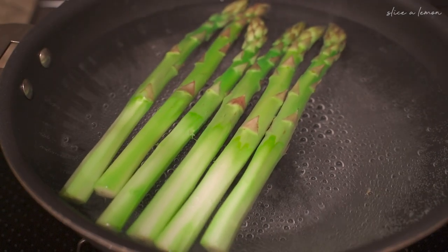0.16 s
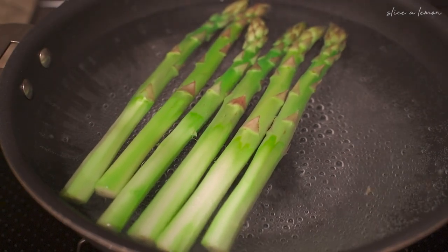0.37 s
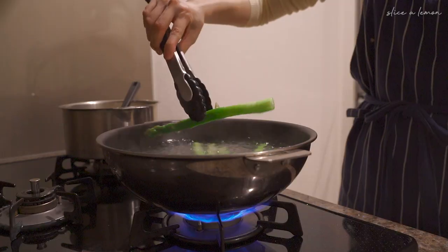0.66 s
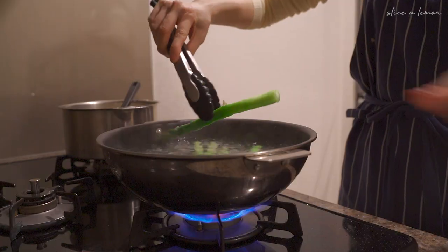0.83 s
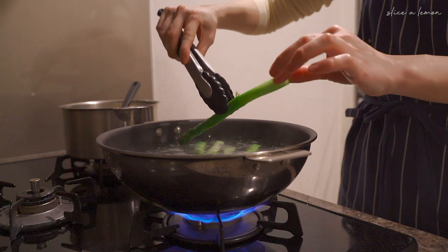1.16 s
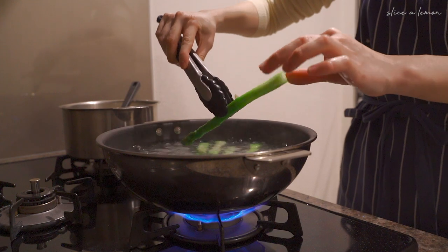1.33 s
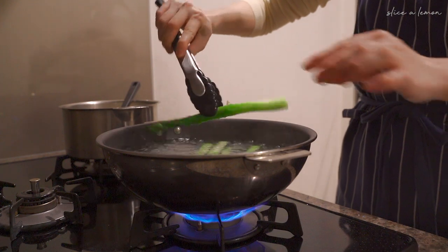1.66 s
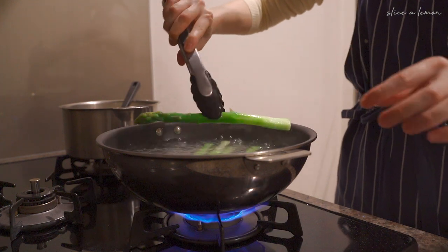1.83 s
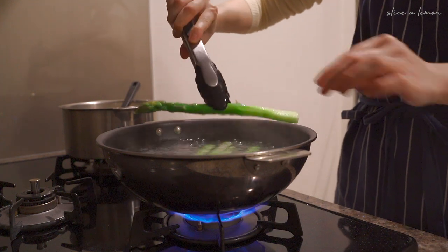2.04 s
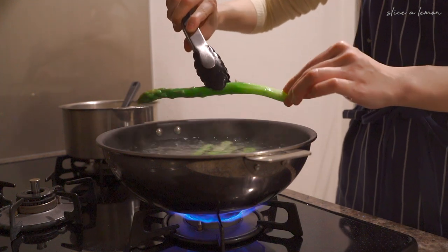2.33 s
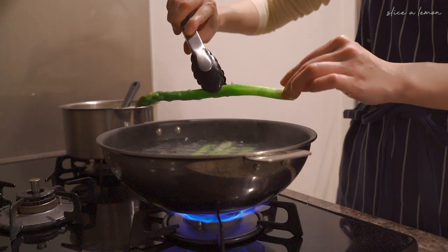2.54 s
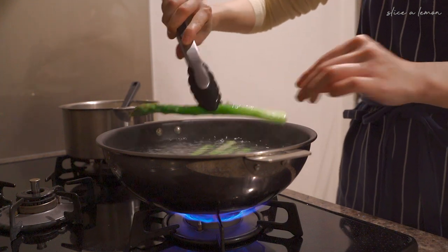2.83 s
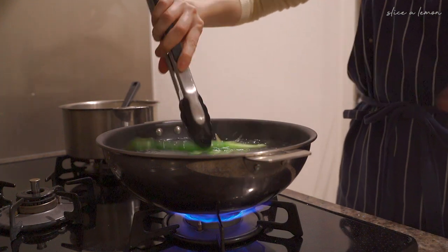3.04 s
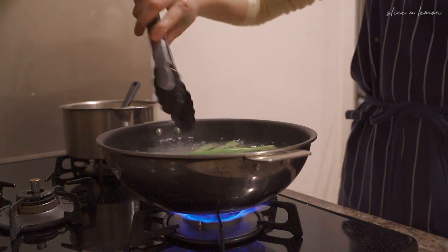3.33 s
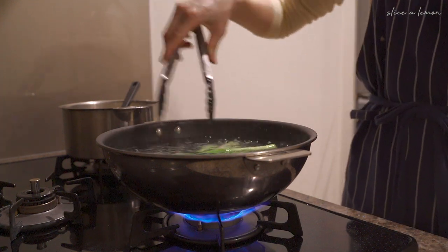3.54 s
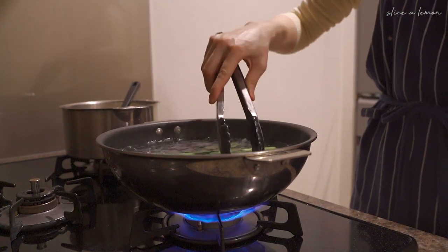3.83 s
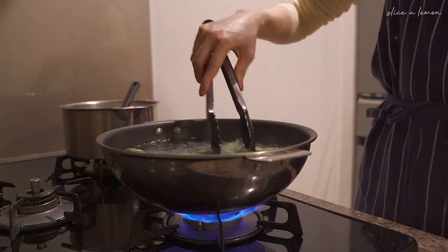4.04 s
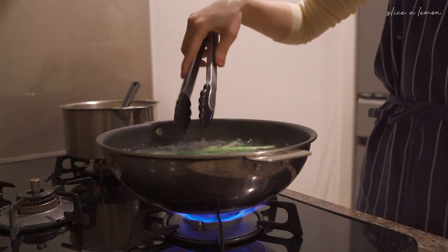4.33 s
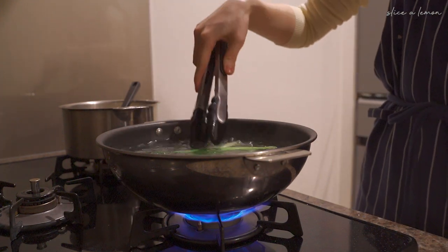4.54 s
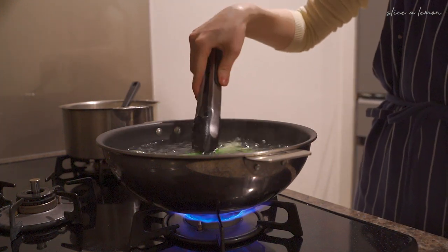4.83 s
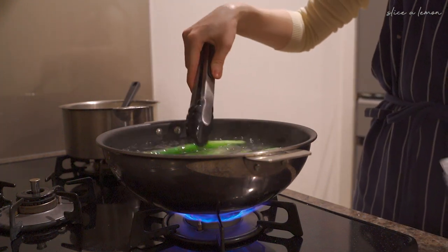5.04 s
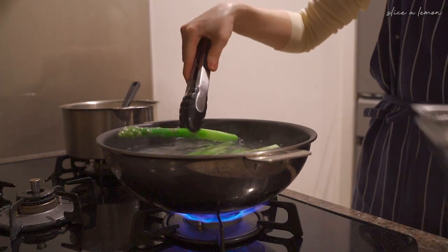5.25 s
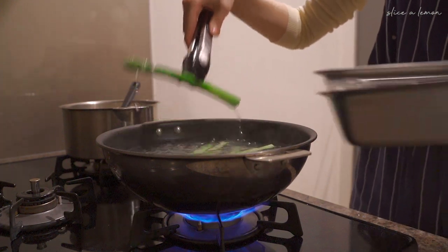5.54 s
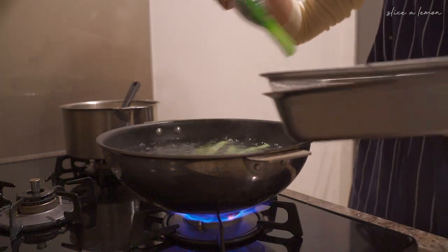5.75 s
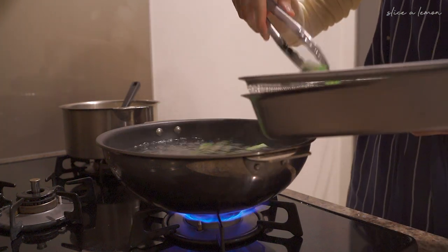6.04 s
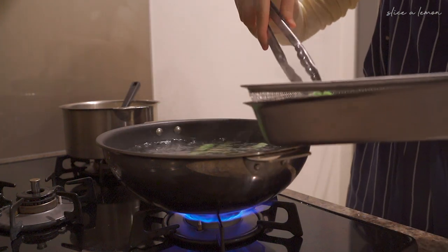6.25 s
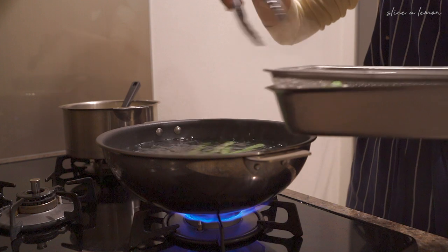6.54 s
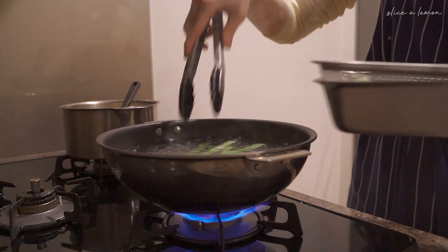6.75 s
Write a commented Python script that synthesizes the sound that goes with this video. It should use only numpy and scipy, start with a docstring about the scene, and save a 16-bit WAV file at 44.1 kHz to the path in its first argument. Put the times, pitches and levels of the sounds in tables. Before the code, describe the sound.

A shallow pan of water with asparagus simmers quietly throughout: dense bubble crackle, a midrange metallic shimmer from the pan, and a faint gas-flame rush. At first it is heard from above; at about 0.5 s the tone switches to a position beside the stove, with a small watery swish and more airy surface fizz. Sparse tiny high pops tick through the simmer. Around 4.0 s tongs stir with a short splashy swish and faint pan tap, and the fizz swells slightly. At 4.5 s a trapped air pocket gives a brief rising bloop, followed by a soft bump at 4.6 s and a firmer, damped clack at 4.8 s. The boil continues alone until 6.2 s, when tongs hit a steel tray with a loud, dull, hollow clank, then at 6.4 s a brighter, sharper rim click. Both ring briefly in a small kitchen, and simmering carries on to the end near 7 s.

```python
"""Asparagus simmers in a shallow pan of water over a gas flame, heard from above the pan.
Half a second in, the listening place changes to beside the stove.
Steam bubbles collapse on the hot base and ring the pan, tiny ones burst at the surface, the flame rushes.
At about four seconds tongs stir the water and knock the pan, and a trapped air pocket rings.
After six seconds they strike a steel tray twice as a spear is laid in it: damped modes, noise and a tick."""
import sys
import numpy as np
from scipy import signal
from scipy.fft import rfft, irfft, next_fast_len
from scipy.io import wavfile
from scipy.ndimage import map_coordinates

SR = 44100
rng = np.random.default_rng(int(sys.argv[2]) if len(sys.argv) > 2 else 0)


def generate_wav(sig):
    """Save sig (samples, or channels by samples) to the path in sys.argv[1] as 16-bit PCM at SR."""
    pcm = np.round(np.clip(np.atleast_2d(sig).T, -1, 1) * 32767).astype(np.int16)
    wavfile.write(sys.argv[1], SR, pcm)


N = 303832
TIME = np.arange(N) / SR
RING_TIME = TIME[:SR // 2]  # the half second given to each knock and to the room tail

# how fast the dense noise of a knock dies on pan or tray: (frequency [Hz], t60 [s])
CLASH_DECAY = [(150, .12), (500, 0.15), (1500, 0.18), (4000, 0.27), (7000, 0.15), (12000, .11)]


def amp(db):
    """Decibels to gain."""
    return 10 ** (np.asarray(db) / 20)


def unit(x):
    """Scale to rms 1."""
    return x / np.sqrt(np.mean(x ** 2) + 1e-20)


def along(points, hz):
    """Read (frequency, value) points on a log frequency axis."""
    f, v = np.transpose(points)
    return np.interp(np.log(hz + 1), np.log(f + 1), v)


def wobble(rate):
    """A smooth random curve with rate knots a second."""
    knots = rng.standard_normal(int(N * rate / SR) + 4)
    return map_coordinates(knots, [TIME * rate])


def filtered(x, response):
    """Multiply the spectrum of x by a response that depends on frequency."""
    m = next_fast_len(len(x) + SR // 2)
    hz = np.fft.rfftfreq(m, 1 / SR)
    return irfft(rfft(x, m) * response(hz), m)[:len(x)]


def resonate(x, modes):
    """Pass x through steep-sided resonances, whose powers add."""
    def response(hz):
        power = 0
        for centre, width, db in modes:
            offset = (hz - centre) / (0.64 * width)
            power = power + amp(db) ** 2 / (1 + offset ** 2) ** 2
        return np.sqrt(power)

    return filtered(x, response)


def coloured(x, spectrum):
    """Give x the colour of a (frequency [Hz], level [dB]) curve."""
    return filtered(x, lambda hz: amp(along(spectrum, hz)))


def roll_off(x, hz, kind, order):
    """A causal low-pass or high-pass."""
    sos = signal.butter(order, min(hz, SR / 2 - 1), kind, fs=SR, output="sos")
    return signal.sosfilt(sos, x)


def dying_noise(spectrum, decay):
    """Coloured noise, starting at rms 1, whose bands die at their own speeds."""
    noise = unit(coloured(rng.standard_normal(len(RING_TIME)), spectrum))
    hz, t, bands = signal.stft(noise, SR, nperseg=256)
    t60 = along(decay, hz)[:, None]
    return signal.istft(bands * amp(-60 * t / t60), SR)[1][:len(RING_TIME)]


def ringing(modes):
    """Sum damped sines (Hz, dB, t60) of alternating sign, their strengths varying a little from blow to blow."""
    t = RING_TIME
    out = np.zeros(len(t))
    for k, (hz, db, t60) in enumerate(modes):
        envelope = amp(db + rng.normal(0, 0.7) - 60 * t / t60)
        out += (-1) ** k * envelope * np.sin(2 * np.pi * hz * t)
    return out


def add(track, s, sound):
    """Mix a sound into the track at time s."""
    room = track[round(s * SR):][:len(sound)]
    room += sound[:len(room)]


def by_place(above, beside):
    """What is heard above the pan gives way quickly to what is heard beside it."""
    move_s, fade_s = 0.53, 0.018
    moved = np.clip((TIME - move_s) / fade_s, 0, 1)
    return (1 - moved) * above + moved * beside


def collapses(rate, spread_db):
    """Bubbles collapse as random impulses of either sign and very unequal size, rms 1."""
    happen = rng.random(N) < rate / SR  # rate is per second
    sign = rng.choice([-1, 1], N)
    size = amp(spread_db * np.minimum(rng.standard_normal(N), 2))
    return unit(happen * sign * size)


def bursts(times, sizes, pitches, cycles):
    """Each bursting bubble is a sine that dies within a few cycles."""
    age = np.arange(128)  # samples
    turns = pitches[:, None] * age / SR
    waves = sizes[:, None] * np.sin(2 * np.pi * turns) * np.exp(-turns / cycles)
    places = (times * SR).astype(int)[:, None] + age
    return np.bincount(places.ravel(), waves.ravel(), N)[:N]


def burner():
    """The gas flame's soft, steady rush is coloured noise."""
    # colour of the flame: (frequency [Hz], relative level per Hz [dB])
    flame = [(25, -36), (70, -31), (100, -22), (130, -7), (170, -11), (200, -3), (240, -11.5), (295, 2),
             (360, 2.5), (430, -8), (700, -5.5), (2000, -21.5)]
    return amp(-74) * unit(coloured(rng.standard_normal(N), flame))


def simmer(modes, seethe, ring_db, seethe_db):
    """Steam bubbles collapse on the hot base: they ring the pan and crackle through the water."""
    ring = unit(resonate(collapses(rate=6000, spread_db=3.0), modes))
    crackle = unit(coloured(collapses(rate=8000, spread_db=2.5), seethe))
    return amp(ring_db) * ring + amp(seethe_db + 0.54 * wobble(22)) * crackle


def water():
    """A steady boil that wavers slightly, coloured differently at each listening place."""
    # resonances of the water-loaded pan at each place: (frequency [Hz], nominal width [Hz], level [dB])
    pan_above = [(562, 43, -10), (1097, 66, -4), (1222, 47, -6), (1662, 67, 1.5), (2170, 70, -11.5),
                 (2260, 53, -9), (2510, 46, -14), (2900, 88, -15), (3060, 79, -6.5), (3410, 50, -11),
                 (3860, 160, -10.5), (6700, 150, -21), (10150, 70, -16), (10900, 250, -20),
                 (12850, 120, -17)]
    pan_beside = [(917, 11, -11.5), (937, 28, -8), (1106.5, 40, -4), (1153, 22, -14), (1264, 25, -10),
                  (1482, 77, -1.5), (1588, 31, -3), (1716, 71, 1.5), (1825, 110, -4), (2225, 47, -9.5),
                  (2514, 33, -11.5), (2794, 64, -4.5), (3015, 150, -13.5), (3950, 120, -15),
                  (4378, 250, -11), (7280, 50, -16), (8200, 100, -16.5), (9920, 230, -23.5),
                  (12610, 55, -13)]
    # the broad seething under the resonances: (frequency [Hz], relative level per Hz [dB])
    seethe_above = [(100, -30), (280, -25), (420, 3), (900, 4), (2000, 6.5), (3800, 2), (5000, -2.5),
                    (9000, -5.5), (12000, -9.5), (15500, -11)]
    seethe_beside = [(150, -15.5), (400, -6), (650, -0.5), (1000, 2), (2000, 2.5), (3200, 2.5),
                     (4500, -0.5), (5200, -3.5), (9000, -6.5), (15500, -12.5)]
    above = amp(-54.5) * simmer(pan_above, seethe_above, ring_db=-3.2, seethe_db=-3.0)
    beside = amp(-53.5) * simmer(pan_beside, seethe_beside, ring_db=-2.5, seethe_db=-3.5)
    return by_place(above, beside) * amp(0.39 * wobble(5.31))


def fizz():
    """Tiny bubbles burst at the surface, more strongly while the water is stirred."""
    above_db, beside_db = -75, -65
    stir_s, stir_spread_s, stir_rise_db = 3.9, 0.8, 2.2
    when, rarity, pitch = rng.random((3800, 3)).T  # one row a bubble
    hz = 6200 + 9800 * pitch
    sizes = amp(5.8 * np.minimum(-np.log(1 - rarity), 3.1)) * hz ** 0.75  # a few are much larger
    crowd = unit(bursts(when * N / SR, sizes, hz, cycles=1.56))
    stirred = np.exp(-0.5 * ((TIME - stir_s) / stir_spread_s) ** 2)
    level_db = by_place(above_db, beside_db) + stir_rise_db * stirred + 1.4 * wobble(14)
    return crowd * amp(level_db)


def pops():
    """Now and then one bubble bursts far louder than the rest, as a brief dying sine."""
    # the loudest surface bubbles: (time [s], level before the common gain [dB], frequency [Hz])
    loud_bubbles = [(0.167, -40, 15000), (0.3531, -37, 15200), (0.7262, -39, 12600), (0.9083, -39, 11200),
                    (0.9547, -40, 13200), (1.8801, -39, 11100), (2.1665, -41, 12700), (2.3944, -39, 12600),
                    (2.7204, -39, 10900), (4.147, -41, 8120), (5.2889, -40, 12600), (6.6847, -41, 8930)]
    common_gain_db = 3
    s, db, hz = np.transpose(loud_bubbles)
    return bursts(s, amp(db + common_gain_db), hz, cycles=2.2)


def stirring():
    """Stirred water fizzes up, and a trapped air pocket rings with a rising pitch."""
    # tongs and spears stirring the water: (time of the middle [s], level [dB], Gaussian spread [s])
    swishes = [(0.57, -60, .04), (4.017, -57.5, 0.02), (4.464, -62, 0.015)]
    # air pockets trapped by the tongs: (time [s], level [dB], starting frequency [Hz])
    glugs = [(4.503, -44, 934)]
    swell = sum(amp(db) * np.exp(-0.5 * ((TIME - s) / spread) ** 2) for s, db, spread in swishes)
    froth = roll_off(collapses(rate=1900, spread_db=7), 2200, "high", order=2)
    out = swell * unit(roll_off(froth, 5100, "low", order=2))
    t = RING_TIME
    for s, db, hz in glugs:
        envelope = amp(db - 60 * t / 0.13) * (1 - np.exp(-t / 0.004))
        add(out, s, envelope * np.sin(2 * np.pi * hz * t * (1 + 0.58 * t)))
    return out


def pan_knocks():
    """The tongs clack on the pan, which the water damps quickly; through a spear the contact is a soft bump."""
    # tongs against the pan: (time [s], gain [dB], low-pass of the contact [Hz])
    knocks = [(4.006, -48, 6000), (4.786, -36, 5600)]
    # colour of the clack: (frequency [Hz], relative level per Hz [dB])
    clack_colour = [(100, -45), (300, -29), (650, -14), (950, -4), (1300, -7), (1800, 6), (2300, 1),
                    (2900, -6.5), (3700, -2.5), (5000, -4), (9000, -8), (15000, -7)]
    # what the tongs ring with as they clack: (frequency [Hz], relative level [dB], t60 [s])
    tongs = [(972, -0.5, .14), (1770, -1, 0.16), (1890, -3, 0.21), (2056, -11, .17), (2395, -6, 0.26),
             (3600, 2.5, .1), (3750, -12, .1)]
    # the tongs press a spear against the base: (time [s], gain [dB])
    bump = (4.607, -44.5)
    # colour of the bump: (frequency [Hz], relative level per Hz [dB])
    bump_colour = [(200, -30), (420, -13), (620, 3.5), (1200, -3), (1900, 5), (2800, -10), (4500, -10),
                   (8000, -24)]
    out, t = np.zeros(N), RING_TIME
    for s, db, bright_hz in knocks:
        clack = dying_noise(clack_colour, CLASH_DECAY) * (0.5 + 0.94 * np.exp(-t / 0.023))
        knock = clack + amp(-8.5) * ringing(tongs)
        add(out, s, amp(db) * roll_off(knock, bright_hz, "low", order=2))
    bump_s, bump_db = bump
    soft_onset = 1 - np.exp(-t / 0.0058)
    add(out, bump_s, amp(bump_db) * dying_noise(bump_colour, CLASH_DECAY) * soft_onset)
    return out


def tray_knocks():
    """A cushioned blow inside the tray drives its low modes, a bare one on the rim its high modes and a sharp tick."""
    # tongs against the tray: (time [s], gain [dB], low-pass of the clash [Hz], high-pass of the clash [Hz],
    # tick gain [dB], place [0 inside to 1 rim])
    knocks = [(6.2245, -21.5, 2620, 260, -58, 0.12), (6.369, -25, 7400, 2200, -23.5, 1)]
    # the tray's modes: (frequency [Hz], level struck inside [dB], level struck on the rim [dB], t60 [s])
    tray_modes = [(591, -20.5, -31, 0.21), (678, -7, -22.5, 0.28), (807, -21, -33, 0.21),
                  (973, -17, -35, 0.2), (1195, -12, -14, 0.18), (1301, -16, -24, 0.14),
                  (1532, -11, -35, 0.26), (1775, -11.5, -15, 0.19), (1790, -14, -15, 0.2),
                  (1900, -27, -19, 0.17), (2000, -23, -29, 0.12), (1980, -15, -15, 0.15),
                  (2100, -21, -17.5, 0.24), (2330, -20, -17, 0.16), (2440, -21, -23, 0.19),
                  (2950, -21, -24, .18), (3034, -20, -26, 0.14), (3310, -18, -16, 0.17),
                  (3570, -33, -9.5, 0.21), (3620, -32, -12, 0.22), (3900, -33, -19, .17),
                  (4280, -49, -22, .21)]
    # its crowd of weak modes: (frequency [Hz], relative level per Hz [dB])
    clash_colour = [(60, -22), (170, -29), (290, -6), (430, -5), (580, -2.5), (720, -1.5), (1000, 2),
                    (1900, 2), (2700, -2), (4400, -2.5), (5500, -7), (8000, -6.5), (15000, -16.5)]
    out, t = np.zeros(N), RING_TIME
    for s, db, bright_hz, low_hz, tick_db, rim in knocks:
        struck = [(hz, inside_db + rim * (rim_db - inside_db), t60)
                  for hz, inside_db, rim_db, t60 in tray_modes]
        ring = ringing(struck)
        clash = dying_noise(clash_colour, CLASH_DECAY) * (0.48 + 0.95 * np.exp(-t / 0.0088))
        clash = roll_off(clash, bright_hz, "low", order=3)
        clash = roll_off(clash, low_hz, "high", order=1)
        tick = roll_off(rng.standard_normal(len(t)), 4100, "high", order=2) * np.exp(-t / 0.0016)
        contact = 1 - np.exp(-t / 0.00049)  # the force takes a moment to build
        add(out, s, amp(db) * contact * (ring + clash) + amp(tick_db) * tick)
    return out


def scene():
    """Everything at the stove, with the answer of a small kitchen as a tail of dying noise."""
    # reverberation of the room: (frequency [Hz], t60 [s])
    kitchen_decay = [(200, 0.29), (2000, 0.3), (6000, 0.22), (14000, 0.055)]
    dry = burner() + water() + fizz() + pops() + stirring() + pan_knocks() + tray_knocks()
    tail = dying_noise([(100, 0), (4000, 0), (15000, -4)], kitchen_decay)
    tail = np.pad(tail, (SR // 200, 0))  # the room answers 5 ms late
    echo = signal.fftconvolve(dry, tail / np.linalg.norm(tail))[:N]
    return (dry + amp(-15.5) * echo)[None]


def record(dry):
    """The microphone sheds the deep bass and keeps nothing above its band limit."""
    top_hz = 15800
    without_bass = roll_off(dry[0], 142, "high", order=3)
    return filtered(without_bass, lambda hz: hz < top_hz)[None]


dry = scene()
out = record(dry)
generate_wav(out)
```